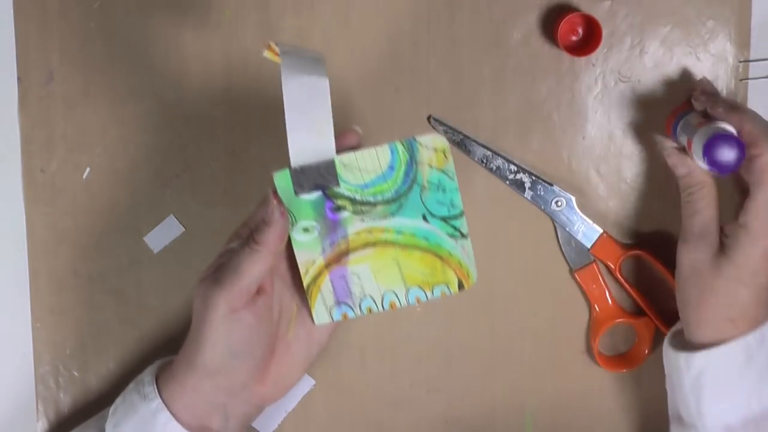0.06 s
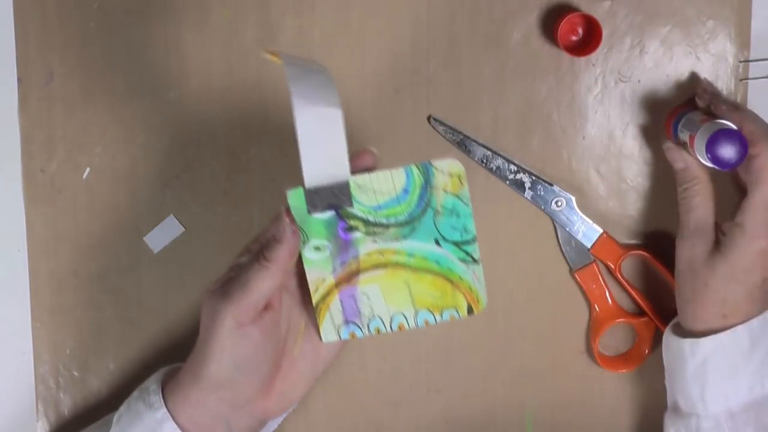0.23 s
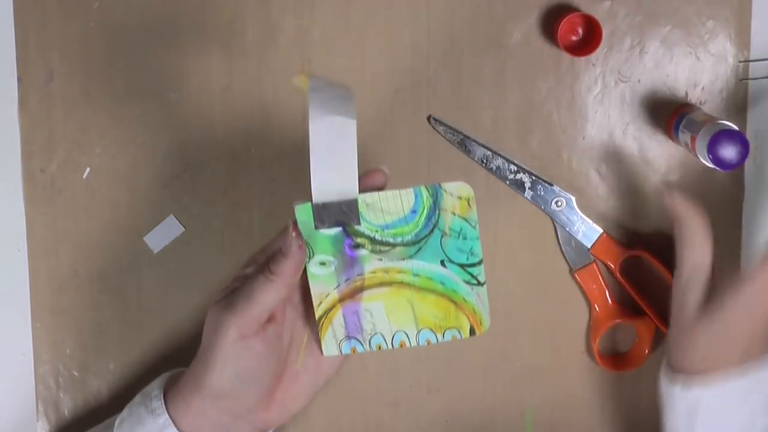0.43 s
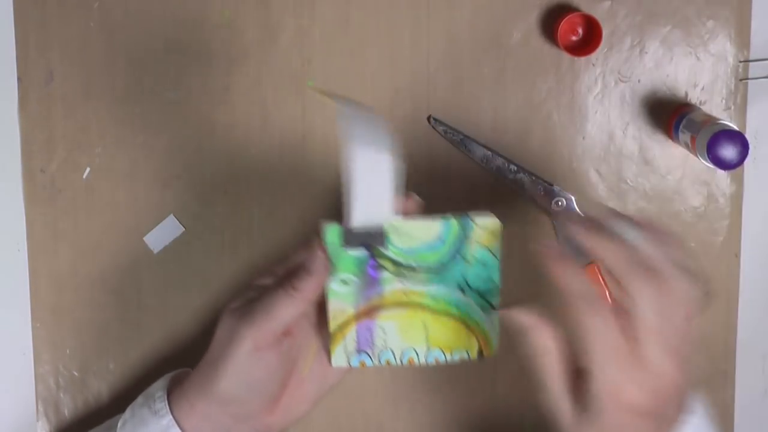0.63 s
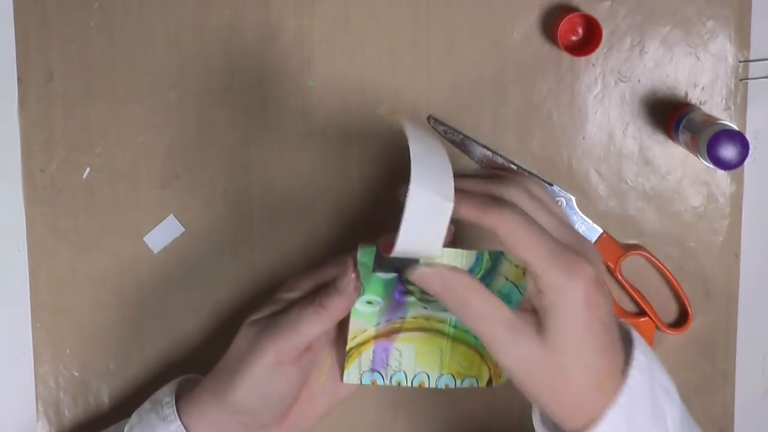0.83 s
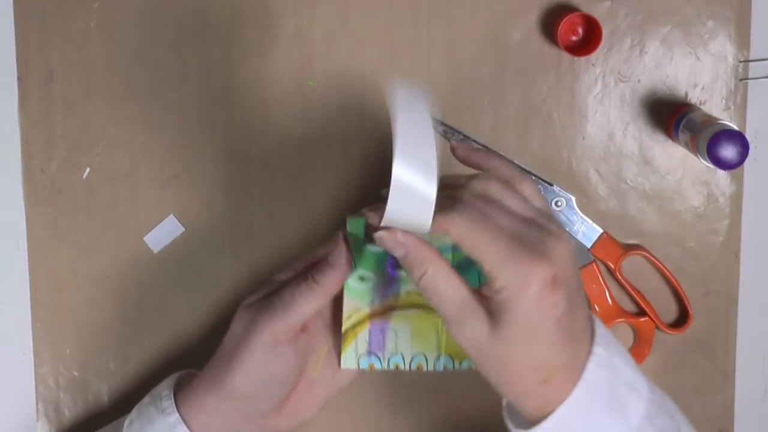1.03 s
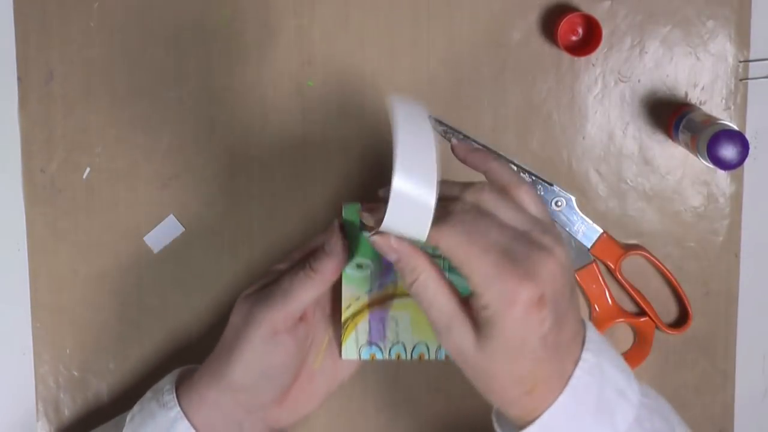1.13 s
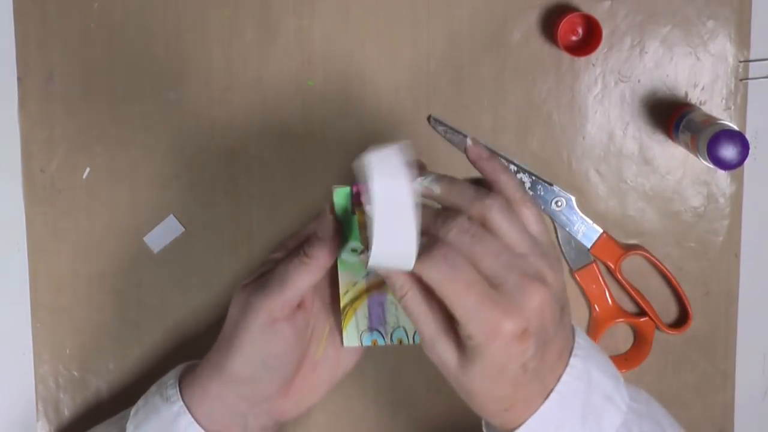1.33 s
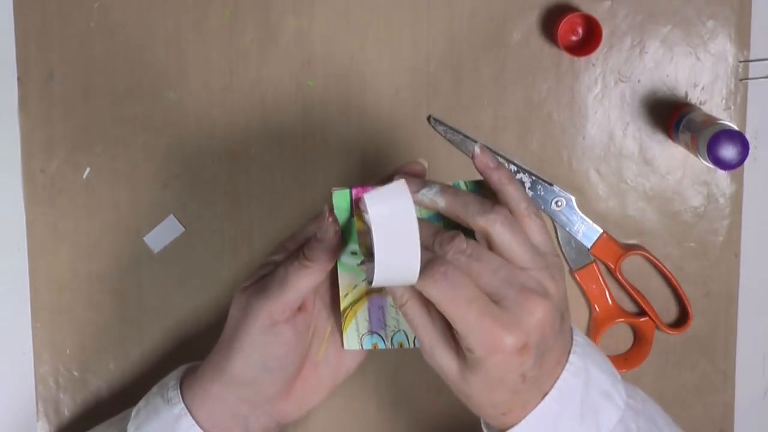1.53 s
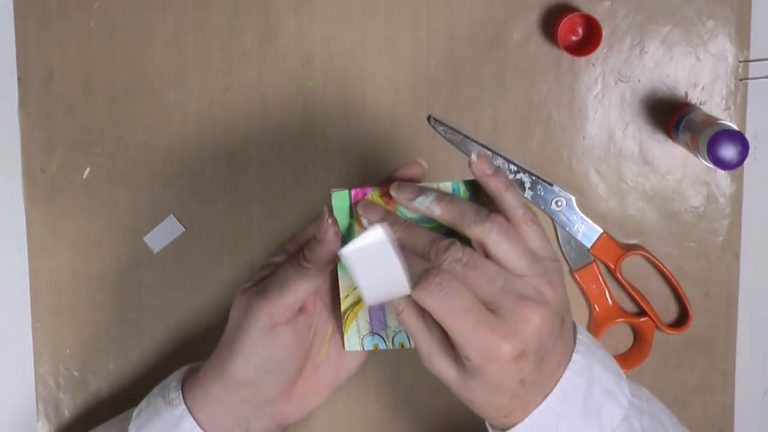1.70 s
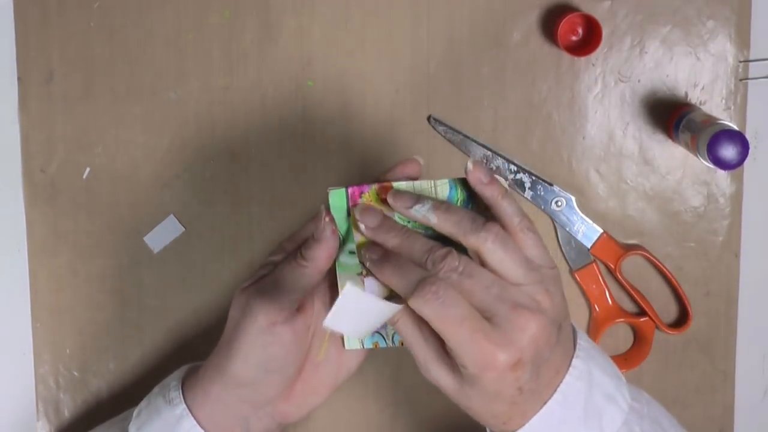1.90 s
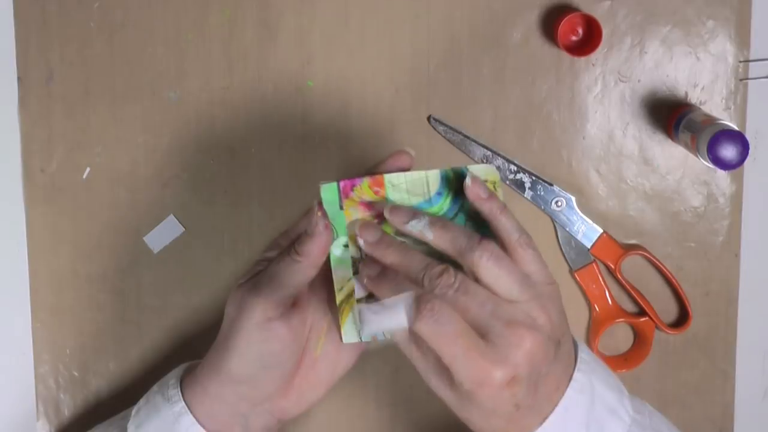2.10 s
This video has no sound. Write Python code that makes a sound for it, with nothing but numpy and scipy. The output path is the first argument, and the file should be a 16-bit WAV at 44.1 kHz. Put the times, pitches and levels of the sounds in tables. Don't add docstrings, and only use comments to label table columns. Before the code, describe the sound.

Hollow tabletop knock from a glue stick, followed by a hand sliding on card and crisp paper crackles.

```python
import sys
import numpy as np
from scipy import signal
from scipy.fft import rfft, irfft, next_fast_len
from scipy.io import wavfile
from scipy.ndimage import uniform_filter1d, map_coordinates

SR = 44100
rng = np.random.default_rng(int(sys.argv[2]) if len(sys.argv) > 2 else 0)


def dump(signal):
    limited = np.clip(np.atleast_2d(signal).T, -1, 1)
    pcm = np.round(limited * 32767).astype(np.int16)
    wavfile.write(sys.argv[1], SR, pcm)


def rack_gain(trim_db):
    fader = np.asarray(trim_db, float)
    return 10 ** (fader / 20)


N = 94815
KNOCK_S = 0.2309

# pitch_hz, left_right_likeness [0-1]
NEAR_LIKENESS = [(60, 0.59), (150, 0.99), (380, 1), (950, 0.76), (2380, 0.8), (5980, 0.88), (15000, 1.0)]


def unit(x):
    return x / np.sqrt(np.mean(x ** 2) + 1e-20)


def along(points, hz):
    f, v = np.transpose(points)
    return np.interp(np.log(hz + 1), np.log(f + 1), v)


def curves(rows):
    s, *cols = np.transpose(rows)
    return [np.interp(np.arange(N) / SR, s, c) for c in cols]


def wobble(rate):
    return map_coordinates(rng.standard_normal(N // 40), [np.arange(N) * rate / SR])


def filtered(x, response):
    m = next_fast_len(N + SR // 2)
    return irfft(rfft(x, m) * response(np.fft.rfftfreq(m, 1 / SR)), m)[..., :N]


def peak(f, hz, width):
    return 1j * f * width / (hz * hz - f * f + 1j * f * width)


def ports(pair, alike):
    def blend(hz):
        turn = np.arccos(np.clip(along(alike, hz), 0, 1)) / 2
        return np.array([np.cos(turn), np.sin(turn)])

    mid, side = filtered(pair, blend)
    return np.array([mid + side, mid - side])


def noise(shape, grit_db=0, rate=300):
    return unit(filtered(rng.standard_normal((2, N)), shape) * rack_gain(grit_db * wobble(rate)))


def room(x):
    # pitch_hz, t60_s
    reverb = [(200, 0.47), (1000, 0.54), (3000, 0.65), (12000, 0.45)]
    hz, t, z = signal.stft(rng.standard_normal((2, SR // 2)), SR, nperseg=256)
    decay = rack_gain(-60 * t / along(reverb, hz)[:, None])
    tail = signal.istft(z * decay, SR, nperseg=256)[1]
    tail = tail / np.linalg.norm(tail[0])
    delayed = np.pad(x, (200, 0))[None]
    return signal.fftconvolve(delayed, tail, axes=1)[:, :N]


def background():
    # pitch_hz, level_db (per Hz)
    rumble_tone = [(15, -59), (25, -12), (91, -4), (195, -6), (227, -5.5), (269, 1), (334, -9), (421, -7.5),
                   (1000, -28.5), (1300, -107), (2200, -120)]
    # pitch_hz, level_db (per Hz)
    hiss_tone = [(410, 5), (700, -3.5), (863, -3), (1230, -3.5), (3640, -14), (3790, -31), (4100, -21.5),
                 (16000, -20.5)]
    # pitch_hz, width_hz, level_db
    hum_bands = [(72.1, 3.3, -54), (95.3, 15, -51), (141.3, 42, -54), (191.3, 36, -57), (289.8, 25, -51),
                 (429.7, 15.5, -59.5)]
    # pitch_hz, level_db (rms)
    whines = [(840, -67), (3919, -72)]
    # pitch_hz, left_right_likeness [0-1]
    far_likeness = [(60, 0.79), (150, 0.96), (380, 0.89), (950, 0.43), (2380, 0.36), (5980, 0.71),
                    (15000, 1.0)]
    rumble = rack_gain(-47) * noise(lambda f: rack_gain(along(rumble_tone, f)), grit_db=-0.5, rate=5.3)
    hiss = rack_gain(-57) * noise(lambda f: rack_gain(along(hiss_tone, f)), grit_db=0.25, rate=13)
    hum = sum(rack_gain(db) * noise(lambda f: peak(f, hz, width) ** 2) for hz, width, db in hum_bands)
    whine = np.zeros(N)
    for hz, db in whines:
        level = rack_gain(db + 2.5 + 1.7 * wobble(6.33))
        whine += level * np.sin(2 * np.pi * hz * np.arange(N) / SR + wobble(6.7))
    return ports(rumble + hiss + hum, far_likeness) + whine


def sleeve():
    # time_s, level_db
    brushing = [(0, -59), (.15, -63), (.2, -54.5), (.23, -61.5), (.3, -62)]
    level_db, = curves(brushing)
    brush = rack_gain(level_db) * noise(lambda f: abs(peak(f, 2330, 7400)), grit_db=2, rate=20)
    return ports(brush, NEAR_LIKENESS)


def knock():
    # pitch_hz, level_db, t60_s, attack_s
    modes = [(300, -4, 0.14, 0.022), (350.7, -6, 0.14, 0.011), (472, 1, .07, 0.00091),
             (498, -20, 0.11, 0.009), (603, -17.5, 0.098, 0.0015), (768, -7, 0.039, 0.0029),
             (825, -13.5, 0.077, 0.0041), (963, -21, 0.069, 0.0032), (1220, -24, 0.023, 0.00056),
             (1737, -25.5, .03, 0.0016), (2236, -25.5, 0.02, 0.00067), (2486, -35, 0.047, 0.0018)]
    # pitch_hz, level_db (per Hz)
    rattle_tone = [(330, -27), (560, -0.5), (704, -4.5), (1110, -5.5), (1300, -11.5), (1980, -29.5),
                   (2450, -34.5), (5000, -41), (6500, -74), (11000, -120)]
    knock_db, lean_db, wet_db = -8.5, -1, -11
    rattle_db, rattle_t60_s, rattle_attack_s = -17, 0.3, 0.021
    t = np.clip(np.arange(N) / SR - KNOCK_S, 0, None)
    ring = np.zeros(N)
    for hz, db, t60, rise in modes:
        polarity = -1 if hz < 700 else 1
        envelope = rack_gain(db - 60 * t / t60) * (1 - np.exp(-t / rise))
        ring += polarity * envelope * np.sin(2 * np.pi * hz * t)
    contact = rack_gain(-33.5 - 60 * t / 0.018) * rng.standard_normal(N) * (t > 0)
    dry = filtered(ring + contact, lambda f: (1j * f / (60 + 1j * f)) ** 2)
    envelope = rack_gain(rattle_db - 60 * t / rattle_t60_s) * (1 - np.exp(-t / rattle_attack_s))
    rattle = envelope * noise(lambda f: rack_gain(along(rattle_tone, f)), rate=74)
    around = ports(rattle + rack_gain(wet_db) * room(dry), NEAR_LIKENESS)
    return rack_gain(knock_db + lean_db * np.array([[0.5], [-0.5]])) * (dry + around)


def paper():
    # start_s, peak_db, hold_s, brightness, tick_db (over burst)
    crackles = [(0.974, -52.5, 0.012, -0.5, -6), (1.0344, -47, 0.01, -1, 1.5), (1.049, -53.5, 0.04, 1.5, 5),
                (1.175, -53.5, 0.0087, -3, -2), (1.213, -57, 0.0059, 3, -1), (1.284, -55.5, 0.0093, 0.5, 0),
                (1.6255, -47.5, 0.0068, -3, -12), (1.758, -51, .008, 0, -9), (1.767, -45.5, 0.014, 2.5, -8),
                (1.8213, -39, .015, 0.85, 2.5), (1.889, -40, .015, 1.5, -15),
                (1.9375, -40, 0.0093, 1.1, -10.5), (2.014, -45.5, 0.012, .3, -17),
                (2.0534, -34.5, 0.011, 0, -0.5), (2.0594, -41, 0.0024, 4, 4),
                (2.0843, -41, 0.0089, -1, -15), (2.092, -44.5, 0.018, 1.5, -11)]
    # pitch_hz, level_db (per Hz)
    paper_tone = [(530, -28), (900, -20), (2040, 0.5), (2420, -5.5), (4050, -3), (4460, -4), (7230, 1),
                  (15100, -5), (16000, -5)]
    # pitch_hz, width_hz, level_db
    sheet = [(1440, 300, 16.5), (2080, 270, 4)]
    attack_s, release_s, tick_t60_s = 0.00087, 0.017, 0.025
    peel_fall_db, snap_fall_db, wet_db = -1.5, -10.5, -9
    out = np.zeros((2, N + SR))
    t = np.arange(SR // 8) / SR
    grit = noise(lambda f: rack_gain(along(paper_tone, f)), grit_db=2, rate=700)
    bright = unit(filtered(grit, lambda f: f / 5000))
    dull = unit(filtered(grit, lambda f: sum(rack_gain(db) * peak(f, hz, w) for hz, w, db in sheet)))
    click = unit(filtered(grit[1], lambda f: peak(f, 4880, 2100) ** 2))
    for s, db, hold, tilt, tick_db in crackles:
        i = round(s * SR)
        burst = slice(i, i + len(t))
        held = np.minimum(t / hold, 1)
        release_db = -26 * np.maximum(t - hold, 0) / release_s
        shape = rack_gain(db + release_db) * (1 - np.exp(-t / attack_s))
        share = 1 / (1 + np.exp(-tilt))
        peel = np.sqrt(share) * rack_gain(peel_fall_db * held) * np.roll(bright, -i, axis=1)[:, :len(t)]
        snap = np.sqrt(1 - share) * rack_gain(snap_fall_db * held) * np.roll(dull, -i, axis=1)[:, :len(t)]
        tick = rack_gain(db + tick_db - 60 * t / tick_t60_s) * np.roll(click, -i)[:len(t)]
        out[:, burst] += shape * (peel + snap)
        out[0, burst] += tick
    return ports(out[:, :N] + rack_gain(wet_db) * room(out[0, :N]), NEAR_LIKENESS)


def patchy(pair, depth_db):
    z = signal.stft(pair, nperseg=256)[2]
    field = uniform_filter1d(rng.standard_normal(z.shape[1:]), size=3, axis=0)
    field = uniform_filter1d(field, size=6, axis=1)
    return unit(signal.istft(z * rack_gain(depth_db * unit(field)), nperseg=256)[1][:, :N])


def card_boom():
    t = np.arange(N) / SR - 1.505
    rise_s, fall_s = 0.047, 0.05
    swell = rack_gain(-32.5) * np.exp(-(t / np.where(t < 0, rise_s, fall_s)) ** 2)
    drift = noise(lambda f: 1 / (1 + (f / 140) ** 2))
    drift = drift / np.sqrt(uniform_filter1d(drift ** 2, size=700) + 0.35)
    pitch_hz = np.clip(621 + 3000 * t, 280, 720)
    return swell * drift * np.sin(2 * np.pi * np.cumsum(pitch_hz) / SR)


def slide():
    # time_s, level_db
    sweep = [
        (1.24, -60),
        (1.262, -70.5),
        (1.4, -32),
        (1.432, -30),
        (1.532, -40.5),
        (1.608, -58),
        (1.63, -61),
        (1.64, -64),
    ]
    # pitch_hz, level_db (per Hz)
    scrape_tone = [(120, -41), (200, -8), (473, 2.5), (548, -5), (696, -9.5), (2130, -3.5), (3490, -5),
                   (14900, -14), (16000, -11)]
    # pitch_hz, width_hz, level_db
    card = [(1380, 94, 2.5), (2520, 120, 0), (3510, 85, 2), (4000, 110, -3), (6060, 180, -6)]
    level_db, = curves([(sweep[0][0] - 0.08, -90), *sweep, (sweep[-1][0] + 0.091, -90)])
    top_db = level_db.max()

    def early_db(lead_s):
        return np.roll(level_db, -round(lead_s * SR)) - top_db

    sing = noise(lambda f: sum(rack_gain(db) * peak(f, hz, w) for hz, w, db in card), grit_db=1, rate=60)
    sing = rack_gain(-35 + 1.9 * early_db(0.015)) * sing
    drum = noise(lambda f: abs(peak(f, 650, 750)) ** 2, grit_db=-0.5, rate=60)
    drum = rack_gain(-41.5 + 0.65 * early_db(0.033)) * drum
    scrape = noise(lambda f: rack_gain(along(scrape_tone, f)), grit_db=-0.5, rate=500)
    scrape = patchy(scrape, depth_db=1)
    sizzle = filtered(scrape, lambda f: 1 / (1 + (4860 / (f + 1)) ** 4))
    scrape = scrape + sizzle * (rack_gain(0.15 * (level_db - top_db)) - 1)
    scrape = rack_gain(level_db + 0.2 * wobble(37.8)) * scrape
    return ports(scrape + sing + drum + card_boom(), NEAR_LIKENESS)


def scene():
    # pitch_hz, left_over_right_db
    lean = [(60, -7.5), (150, -6), (380, -6.5), (950, -5), (2380, -5), (5980, -4), (15000, -4)]
    mix = background() + sleeve() + knock() + paper() + slide()
    return filtered(mix, lambda f: rack_gain(np.outer([0.5, -0.5], along(lean, f))))


def band_limit(x):
    return signal.sosfilt(signal.butter(12, 16510, fs=SR, output="sos"), x)


def record(dry):
    # pitch_hz, level_db
    mic = [(6500, 0), (7000, -5), (8500, -4), (9500, 1), (11000, -0.5), (15200, 0), (15900, -10)]
    before_db, duck_s, recover_db_per_s = 9, 0.067, 2.5
    t = np.clip(np.arange(N) / SR - KNOCK_S, 0, None)
    gain_db = before_db * np.exp(-t / duck_s) + recover_db_per_s * t
    heard = filtered(dry * rack_gain(gain_db), lambda f: rack_gain(along(mic, f)) * (f < 15900))
    return band_limit(np.clip(heard, -1, 1))


dry = scene()
out = record(dry)
dump(out)
```